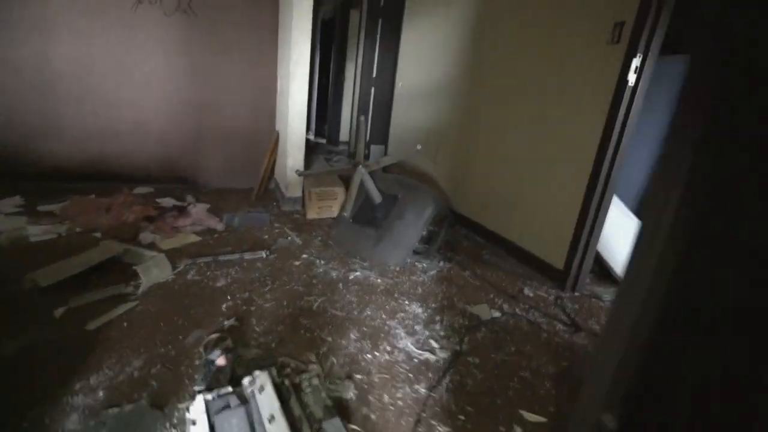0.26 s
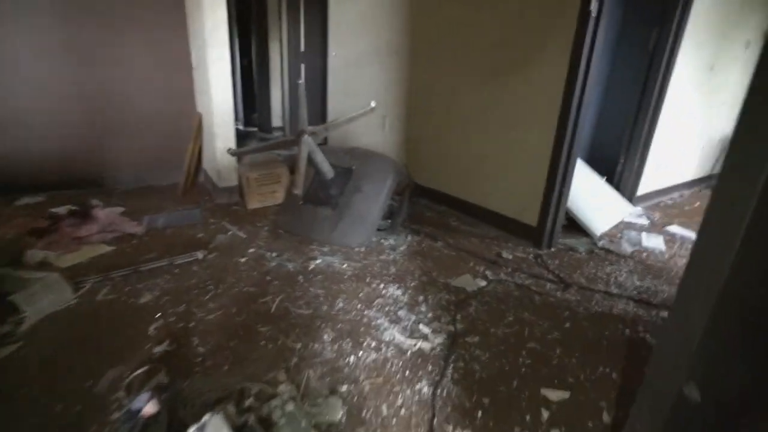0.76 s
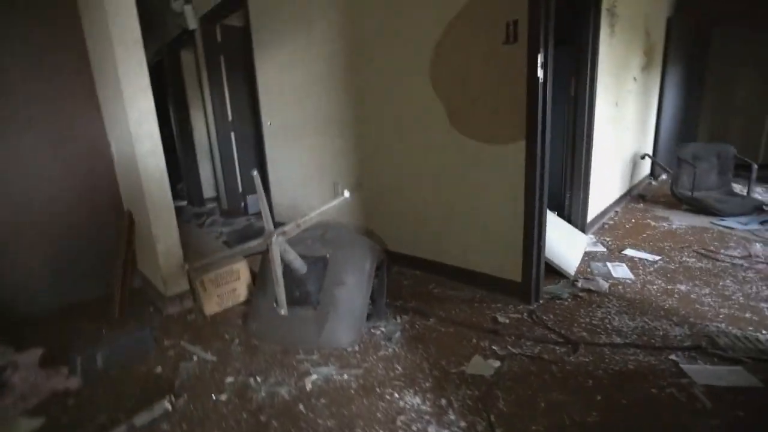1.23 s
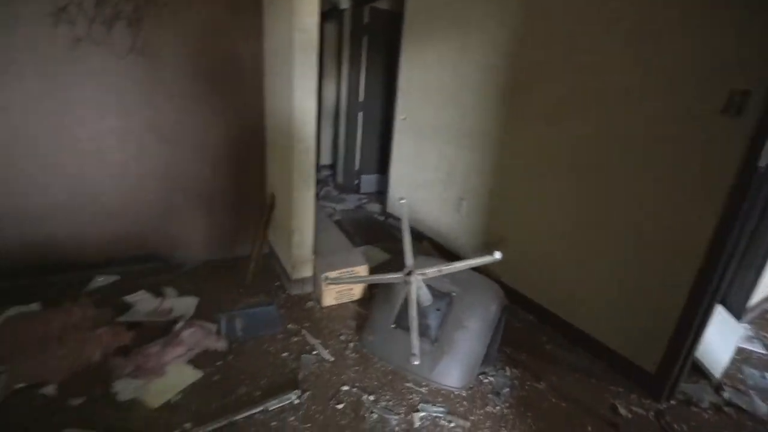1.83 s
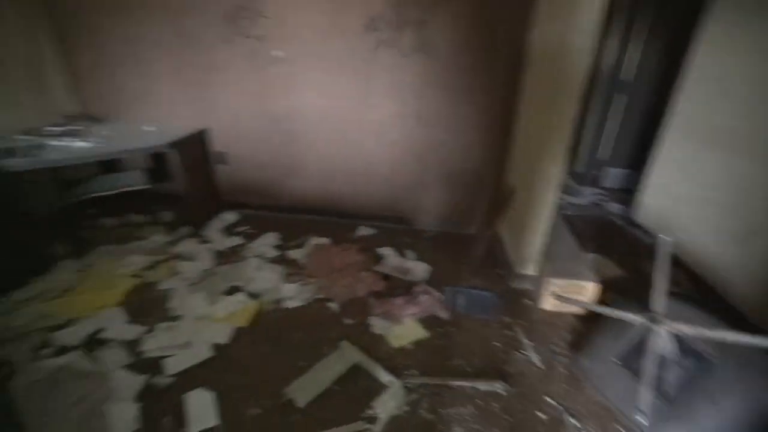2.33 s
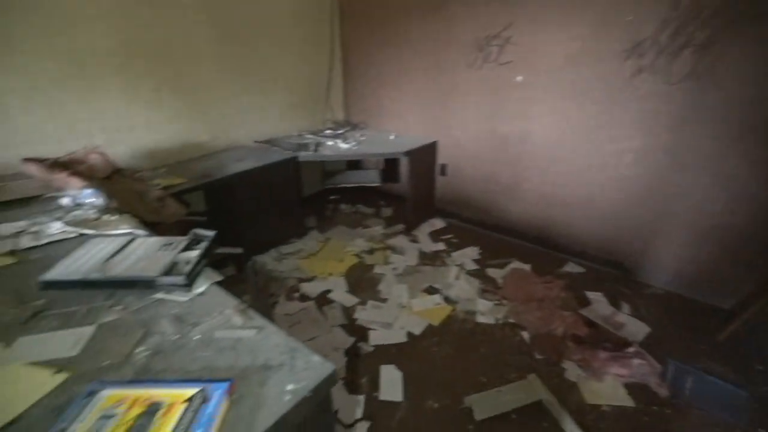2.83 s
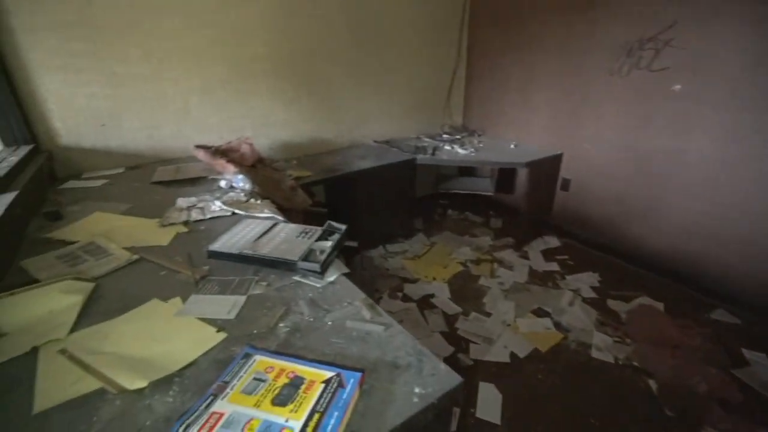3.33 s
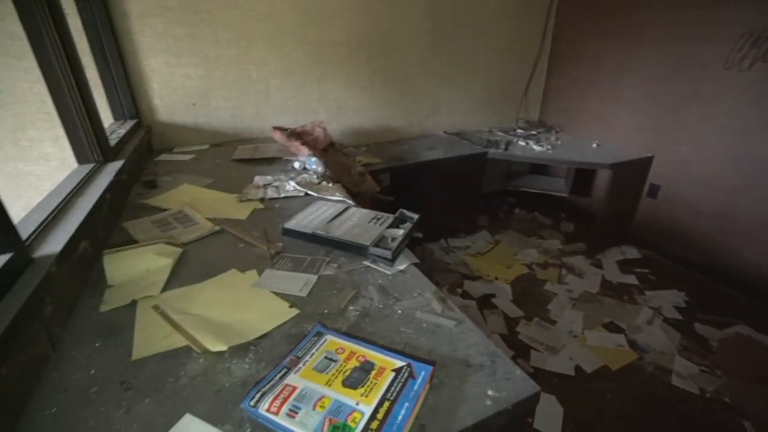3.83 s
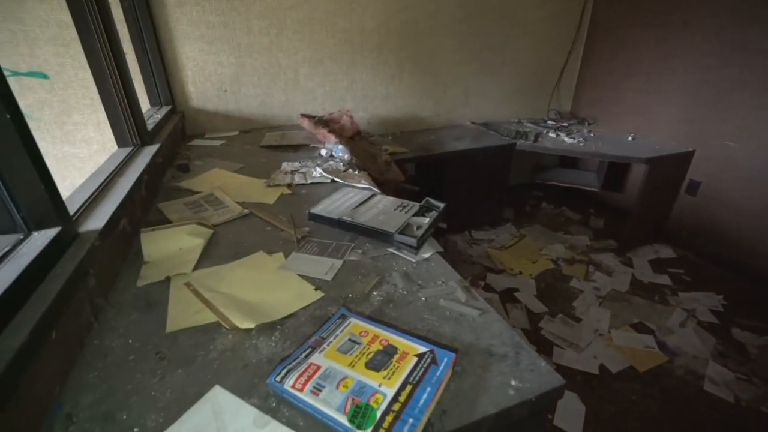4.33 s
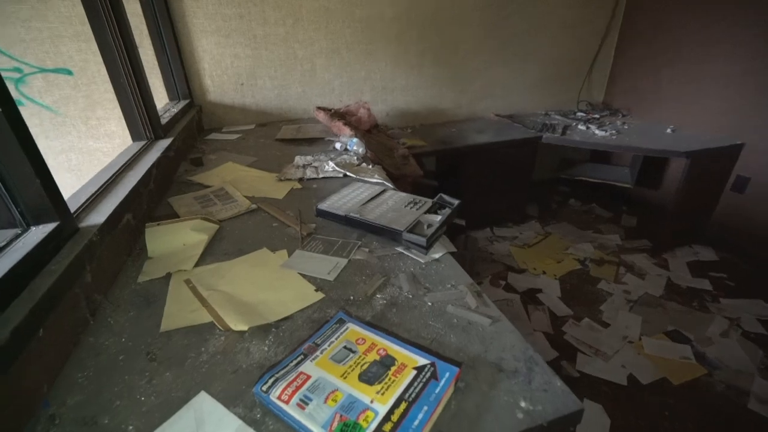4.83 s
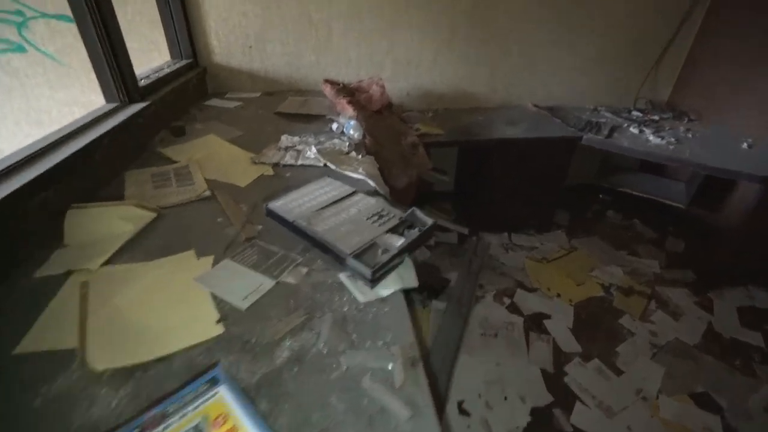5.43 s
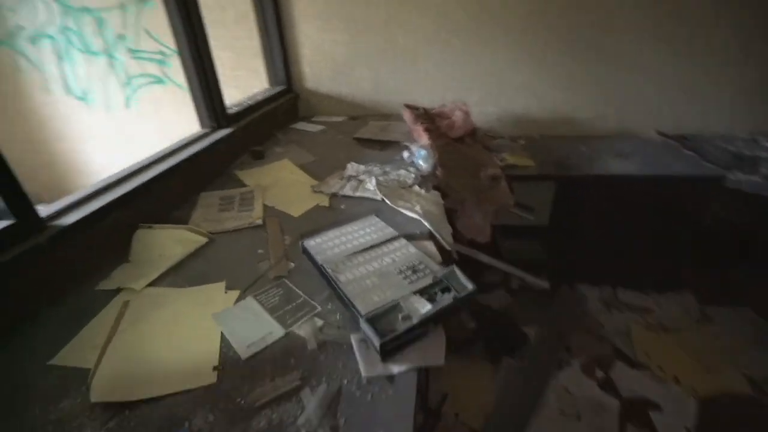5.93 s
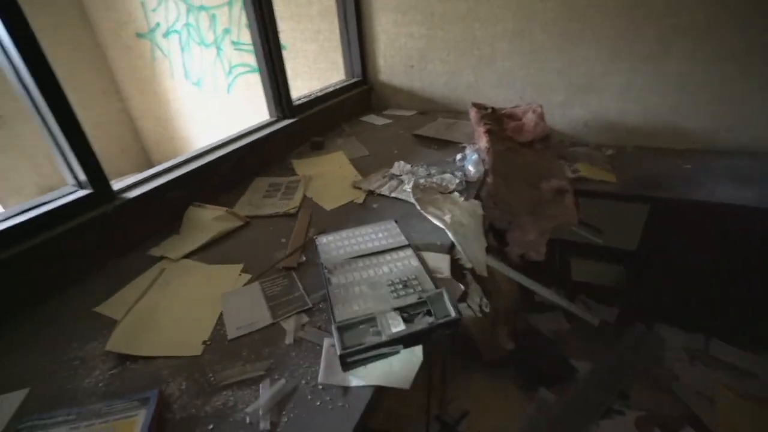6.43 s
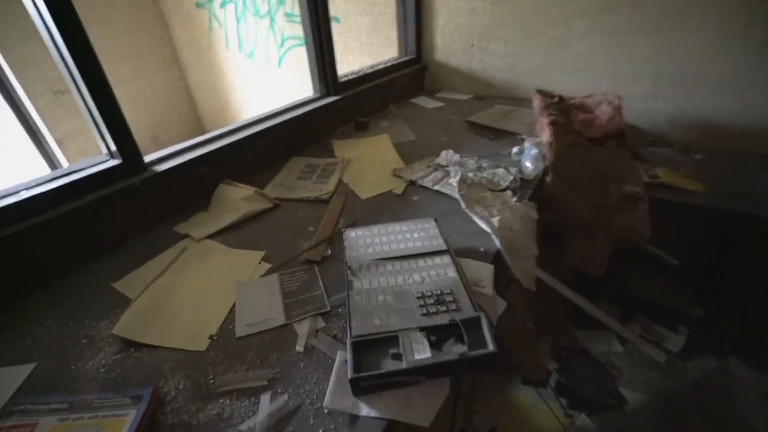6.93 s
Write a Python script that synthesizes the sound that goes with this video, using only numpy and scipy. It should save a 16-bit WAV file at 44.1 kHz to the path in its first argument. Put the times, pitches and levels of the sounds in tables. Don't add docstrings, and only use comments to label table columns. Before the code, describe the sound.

Close, crisp stereo sound of soles pressing glass grit, paper and carpet inside a small hard-walled room. Busy cracking and tinkling fragments come first, including a strong thud with a faint metallic ring, then a heavy scuffing step. The walking thins to light knocks and near silence before glass grinds again under a dragging foot. Dry ticks and faint scuffs end it, over low air rumble and soft hiss.

```python
import sys
import numpy as np
from scipy import signal
from scipy.fft import rfft, irfft, next_fast_len
from scipy.io import wavfile
from scipy.ndimage import uniform_filter1d

SR = 44100
rng = np.random.default_rng(int(sys.argv[2]) if len(sys.argv) > 2 else 0)


def ratio(d):
    e = np.asarray(d, float) / 20
    return 10 ** e


def unload_wav(signal):
    wavfile.write(
        sys.argv[1],
        SR,
        np.round(np.clip(np.atleast_2d(signal).T, -1, 1) * 32767).astype(np.int16),
    )


N = 316638


def evened(x):
    return x / np.sqrt(np.mean(x ** 2) + 1e-20)


def peaked(x):
    return x / abs(x).max()


def read(points, hz):
    point_hz, value = np.transpose(points)
    return np.interp(np.log(hz + 1), np.log(point_hz + 1), value)


def curve(table, column):
    rows = np.array(table)
    return np.interp(np.arange(N) / SR, rows[:, 0], rows[:, column])


def add(mix, start_s, sound, pan_db, lag=1):
    for side, sign, late in ((0, 1, 0), (1, -1, lag)):
        part = mix[side, round(start_s * SR) + late:][:len(sound)]
        part += ratio(sign * pan_db / 2) * sound[:len(part)]


def ring(hz, t60_s, rise_s=0.0001, size=4096):
    t = np.arange(size) / SR
    return ratio(-60 * t / t60_s) * (1 - np.exp(-t / rise_s)) * np.sin(2 * np.pi * hz * t)


def band(x, low_hz, high_hz):
    return signal.sosfilt(signal.butter(2, [low_hz, high_hz], "band", fs=SR, output="sos"), x)


def swells(start_s, hold_s, top_db, rise_db_per_s, fall_db_per_s, rest_db):
    t = np.arange(0, N + 64, 64)[:, None] / SR
    down_db = rise_db_per_s * np.maximum(start_s - t, 0)
    down_db = down_db + fall_db_per_s * np.maximum(t - start_s - hold_s, 0)
    power = (ratio(top_db - down_db) ** 2).sum(1) + ratio(rest_db) ** 2
    return np.interp(np.arange(N) / SR, t[:, 0], 10 * np.log10(power))


# start_s, left_right_db
FEET = [
    (0, -2.5),
    (.8, 3),
    (2.0, 5.5),
    (2.5, -2),
    (3.2, 1),
    (3.8, -1.5),
    (5.0, -1.5),
    (6.0, 0.5),
    (7.18, -3.5),
]
# start_s, peak_db, pitch_hz, edge_db,
# room_db
SNAPS = [(0.0768, -24, 2600, -49, -24), (0.229, -26, 3600, -36, -10), (0.243, -21, 5200, -17, -14),
         (0.266, -23.5, 2350, -8.5, -4.5), (0.8368, -26, 1520, -50, -1), (0.8885, -25.5, 4600, -22, -8),
         (0.9384, -25.5, 3670, -36, -4.5), (1.1752, -24.5, 4900, -30, -9), (1.2474, -18, 4220, -40, -6),
         (1.3023, -20, 4300, -45, -7.5), (1.422, -15, 2700, -46, -15.5), (1.5428, -21.5, 4200, -30, -1),
         (1.7454, -31, 5150, -15.5, -2.5), (1.903, -22, 4350, -12, -8), (1.9525, -20, 4700, -16, -7),
         (1.982, -22.5, 2140, -17, -1.5), (1.998, -23, 5160, -11, 2), (2.0034, -18, 1900, -11, -8.5),
         (2.6452, -25, 2820, -38, -6), (2.6566, -22.5, 2940, -22, -9), (2.7724, -18, 1890, -47, -3),
         (3.484, -32.5, 1580, -26, -4.5), (4.1988, -50, 6200, 7.5, -21), (5.0005, -28.5, 1525, -22, -1.5),
         (5.047, -21.5, 2930, -36, 0), (5.136, -21.5, 1480, -36, 0)]
# start_s, peak_db, pitch_hz
CHIPS = [(0.434, -36, 3000), (0.662, -36, 3120), (0.6902, -41, 3100), (0.7333, -31, 3100),
         (0.9164, -29.5, 3660), (1.106, -37.5, 2720), (1.133, -33, 1670), (1.1873, -34, 1670),
         (1.3304, -24.5, 1400), (1.8441, -29, 1940), (2.149, -46, 1780), (2.498, -39, 2850),
         (2.61, -33, 1740), (3.1266, -42.5, 1530), (3.234, -43, 1300), (3.2514, -46, 1360),
         (3.263, -44, 1780), (3.2988, -38.5, 1300), (3.31, -47, 1300), (3.5589, -37.5, 1320),
         (3.863, -46, 2350), (3.754, -48, 2510), (2.59, -35, 2000), (4.185, -48.5, 1430),
         (4.956, -44, 1570), (5.319, -33, 1310), (5.9782, -47, 1310), (6.0484, -39.5, 1790),
         (6.2, -42, 1390), (6.9265, -46, 1390), (6.9857, -39, 1270)]
# start_s, peak_db, pitch_hz
SLIVERS = [(0.1735, -32, 4700), (0.1875, -30, 2900), (0.246, -31, 3600), (0.2795, -25.5, 5300),
           (0.614, -38.5, 5800), (0.6179, -43, 5800), (0.7698, -50, 4470), (0.8127, -38.5, 5230),
           (0.945, -34, 6000), (0.954, -35, 6000), (1.0227, -28.5, 4760), (1.0305, -33, 5800),
           (1.0465, -28, 5370), (1.0827, -27, 5300), (1.133, -27, 5540), (1.1452, -28, 4900),
           (1.1838, -34, 5500), (1.1884, -34, 6000), (1.2105, -28, 5300), (1.2192, -30, 5500),
           (1.265, -29, 5130), (1.372, -26, 4300), (1.5062, -41, 5530), (1.6074, -35, 5000),
           (1.632, -28, 5760), (1.6942, -41, 5000), (1.7279, -40, 6500), (1.7347, -34, 6270),
           (1.7761, -40, 6500), (1.8162, -31, 6500), (1.8353, -30, 6160), (1.886, -33, 6500),
           (1.8904, -29, 5760), (1.915, -34, 4030), (2.1612, -43, 5500), (2.189, -40, 5530),
           (2.1998, -43, 5500), (2.211, -41, 5500), (2.26, -41, 5500), (2.28, -35, 5730),
           (2.298, -34, 6000), (2.3092, -40, 4430), (2.5106, -34, 5800), (3.7157, -50, 6500),
           (3.767, -40.5, 5940), (3.7887, -49, 6000), (3.823, -57, 6500), (3.875, -51, 6500),
           (3.986, -51, 8000), (5.4796, -41, 5500), (5.512, -42, 5500), (5.569, -42, 4870),
           (5.6147, -40, 4480), (5.7008, -46, 5940), (5.7366, -40, 3960), (5.927, -49, 6500),
           (7.144, -46, 4500), (7.15, -43, 6500)]
CHIP_EDGE_DB, CHIP_ROOM_DB, SLIVER_EDGE_DB, SLIVER_ROOM_DB = -25, -1.5, -32, -4.5


def cracks(near, far):
    t, pan_db = np.arange(2048) / SR, curve(FEET, 1)
    click = 1. * (t == 0)
    chips = [(*row, CHIP_EDGE_DB, CHIP_ROOM_DB) for row in CHIPS]
    slivers = [(*row, SLIVER_EDGE_DB, SLIVER_ROOM_DB) for row in SLIVERS]
    for k, (start_s, peak_db, hz, edge_db, room_db) in enumerate(SNAPS + chips + slivers):
        splinters = click + .6 * rng.standard_normal(2048) * ratio(-60 * t / .01)
        for drive, mix, more_db in ((splinters, near, 2), (click, far[k % 3], room_db + 13)):
            body = band(drive, hz / 1.3, hz * 1.3)
            body = body + .6 * band(drive, max(hz / 2, 900), max(hz * 1.4, 6500))
            edge = band(band(drive, 5500, 12500), 4000, 14500)
            snap = peaked(body) + ratio(edge_db + 6) * peaked(edge)
            add(mix, start_s, ratio(peak_db + more_db) * snap, pan_db[round(start_s * SR)])


# start_s, peak_db
SPECKS = [(0.1572, -33), (0.243, -26), (0.267, -31), (0.2797, -36), (1.1058, -33), (1.2493, -28),
          (1.555, -26.5), (1.6785, -39), (1.7621, -37), (1.8357, -35), (1.9025, -31), (1.9529, -33),
          (1.982, -31), (1.9981, -31), (2.0028, -23), (2.1103, -46), (2.1495, -45), (2.1779, -42),
          (2.4877, -40), (2.4992, -36), (2.6214, -36), (2.632, -40), (2.6381, -35), (2.658, -45),
          (2.7868, -40), (3.565, -47), (3.791, -48), (3.959, -56), (4.9675, -44), (4.9868, -41),
          (5.015, -31), (5.0601, -30), (5.1494, -24), (5.2838, -39), (5.6183, -40), (5.7004, -47),
          (5.7089, -40), (7.1548, -38)]
SPECK_LOW_HZ, SPECK_HIGH_HZ, SPECK_T60_S = 6500, 12800, 0.011


def specks(near, far):
    t, pan_db = np.arange(1024) / SR, curve(FEET, 1)
    for start_s, peak_db in SPECKS:
        burst = rng.standard_normal(1024) * ratio(-60 * t / SPECK_T60_S)
        flick = band(band(burst, SPECK_LOW_HZ, SPECK_HIGH_HZ), SPECK_LOW_HZ, 17000)
        flick = ratio(peak_db) * peaked(flick)
        add(near, start_s, flick, pan_db[round(start_s * SR)])
        add(far[2], start_s, flick, 0)


def grains(low_hz, high_hz, per_s, cycles, spread_db, count=16):
    clump = ratio(2.5 * evened(uniform_filter1d(rng.standard_normal(N), 500)))
    size = ratio(spread_db * np.minimum(rng.exponential(1, N), 3.5))
    size *= rng.random(N) < clump * per_s / SR
    size *= rng.choice([-1., 1.], N)
    kind, out = rng.integers(0, count, N), np.zeros((2, N))
    for k, hz in enumerate(np.geomspace(low_hz, high_hz, count)):
        grain = ring(hz, cycles / hz, size=1024)
        one = signal.oaconvolve(size * (kind == k), grain / np.linalg.norm(grain))[:N]
        out += one * ratio((-1) ** k * np.array([[4.], [-4.]]))
    return evened(out) * ratio(curve(FEET, 1) * np.array([[.5], [-.5]]))


# start_s, hold_s, grit_db, scuff_db (glass grit; paper and carpet scuff)
PRESSES = [(0.0, 0.0055, -44.5, -41), (0.077, 0.008, -41, -41.5), (0.15, 0.019, -50, -62),
           (0.362, 0.14, -54, -55), (0.561, 0.23, -54.5, -56.5), (0.882, 0.14, -42, -48.5),
           (1.047, 0.33, -49, -47.5), (1.294, 0.047, -41, -48), (1.424, 0.03, -40, -38.5),
           (1.493, 0.29, -54.5, -56), (1.838, 0.073, -47, -49.5), (1.898, 0.018, -47, -55),
           (1.956, .015, -45, -52), (2.001, 0.048, -37, -50), (2.077, 0.11, -51.5, -57.5),
           (2.266, 0.21, -51.5, -54.5), (2.487, 0.11, -47, -75), (2.723, 0.11, -52.5, -49.5),
           (2.846, 0.83, -66, -63.5), (3.71, 0.23, -65.5, -67), (4.45, 0.55, -94, -72),
           (4.961, 0.013, -50.5, -58), (5.005, 0.082, -42, -59), (5.142, 0.033, -39.5, -60),
           (5.322, 0.073, -44, -60), (5.43, 0.41, -60.5, -61), (5.61, 0.022, -55, -64),
           (5.726, 0.024, -57.5, -69), (5.92, 0.23, -60.5, -58.5), (6.164, 0.073, -59, -53.5),
           (6.944, 0.073, -52.5, -47), (7.057, 0.17, -58.5, -50.5)]
PRESS_DB_PER_S, LIFT_DB_PER_S, REST_DB = 614, 256, -73
DUST_DB, DUST_FOLLOW = -58, 0.72
# peak_s, spread_s, grit_db, scuff_db, dust_db
SLIDES = [
    (0.319, 0.24, -41, -43, -48.5),
    (2.025, 0.067, -50, -43.5, -56),
    (2.667, 0.17, -38.5, -39.5, -57),
    (4.2, 0.02, -62, -80, -59),
    (5.186, 0.21, -48, -48.5, -53),
    (5.253, 0.22, -45, -44.5, -50),
    (5.37, 0.18, -45.5, -46.5, -51),
    (6.243, 0.14, -49.5, -52, -55),
    (6.58, 0.34, -66.5, -62, -73),
    (7.01, 0.058, -49.5, -50, -55),
]
SLIDE_DB, STOP_DB_PER_S, SLIDE_HOLD_S = 16.5, 439, 0.017


def crunch():
    start_s, hold_s, grit_db, scuff_db = np.transpose(PRESSES)
    grit_db = swells(start_s, hold_s, grit_db, PRESS_DB_PER_S, LIFT_DB_PER_S, REST_DB)
    scuff_db = swells(start_s, hold_s, scuff_db, PRESS_DB_PER_S, LIFT_DB_PER_S, REST_DB)
    dust_db = DUST_DB + DUST_FOLLOW * (grit_db + 50)

    peak_s, spread_s, *slide_levels_db = np.transpose(SLIDES)
    slide_start_s, build_db_per_s = peak_s - SLIDE_HOLD_S / 2, SLIDE_DB / spread_s
    slid_grit, slid_scuff, slid_dust = [
        ratio(swells(slide_start_s, SLIDE_HOLD_S, db, build_db_per_s, STOP_DB_PER_S, -120))
        for db in slide_levels_db]

    grit = ratio(grit_db) * grains(1800, 7500, 2600, 8, 2.6)
    grit = grit + slid_grit * grains(1400, 5600, 3000, 8, 2.3)
    scuff = np.hypot(ratio(scuff_db), slid_scuff) * grains(400, 2100, 1500, 6, 2.3)
    dust = np.hypot(ratio(dust_db), slid_dust) * grains(7000, 14000, 5000, 5, 2.5)
    return ratio(-2) * band(grit + scuff + dust, 180, 20000)


TWIN_SHARE, TWIN_RATIO = 0.35, 1.09


def strike(near, far, start_s, peak_db, hz, t60_s, room_db, rough_share):
    t = np.arange(4096) / SR
    thump = peaked(band(1. * (t == 0), 197, 1750))
    modes = ring(hz, t60_s, 1 / hz) + TWIN_SHARE * ring(hz * TWIN_RATIO, t60_s / 2, 1 / hz)
    piece = peaked(band(modes, 185, 4200))
    burst = rng.standard_normal(4096) * ratio(-60 * t / 0.07) * (1 - np.exp(-t / 0.00017))
    rough = peaked(band(burst, 420, 1050))
    air_s = start_s + .001
    add(near, air_s - .005, ratio(peak_db - 22) * ring(300, .02, .002), 1.5)
    add(near, air_s, ratio(peak_db - 5) * (piece + rough_share * rough), 1.5, 4)
    add(far, air_s, ratio(peak_db + room_db - 3.5) * (.6 * piece + 2.04 * thump), 0)


# start_s, peak_db, pitch_hz, room_db
KNOCKS = [(0.074, -23.5, 283, 2.5), (0.174, -30, 290, 1), (0.262, -30.5, 750, 2), (0.834, -29.5, 835, -0.5),
          (1.209, -27.5, 306, 0.5), (1.2466, -17.5, 1490, -0.5), (1.343, -23.5, 320, -11),
          (1.4225, -12, 345, -5), (1.999, -27.5, 620, -6.5), (2.357, -38.5, 370, 9),
          (2.526, -32.5, 375, 2.5), (2.641, -25.5, 340, -7), (2.7725, -10, 350, -2),
          (3.125, -25.5, 293, -3), (3.232, -31, 477, 0.5), (3.246, -28, 563, -6), (3.261, -25, 540, -4),
          (3.295, -23.5, 356, -6), (3.311, -27.5, 513, -5), (3.48, -22, 513, -5.5), (3.561, -36.5, 526, -5),
          (4.391, -46.5, 530, -11), (4.997, -37, 1050, -20), (5.0458, -26, 374, 1),
          (5.135, -26, 1000, -5.5), (5.316, -35.5, 1030, 5.5), (5.609, -38.5, 655, -8),
          (5.973, -38.5, 1090, -2), (6.003, -37, 634, 0), (6.159, -41, 910, -7), (6.169, -41, 1100, -8),
          (6.179, -38, 960, -8), (6.1982, -32.5, 805, -11), (6.211, -36, 1010, -5), (6.986, -28, 335, 2.5)]
KNOCK_T60_S = 0.015


def knocks(near, far):
    for k, (start_s, peak_db, hz, room_db) in enumerate(KNOCKS):
        strike(near, far[k % 3], start_s, peak_db, hz, KNOCK_T60_S, room_db, rough_share=.6)


# start_s, peak_db, pitch_hz, t60_s, room_db
CLACKS = [(0.0746, -25, 291, 0.092, 0), (0.0785, -18.5, 1087, 0.039, -10), (0.0755, -23, 590, .015, -1),
          (1.134, -41, 1550, .1, 8), (0.971, -18.5, 1137, 0.062, -2), (5.226, -32.5, 1104, 0.045, 4.5),
          (5.389, -37, 1200, 0.041, 9.5), (6.212, -38, 1430, 0.029, 8), (7.7, -42, 1500, .02, 6),
          (6.989, -29.5, 1015, 0.057, -2), (7.03, -47, 2125, 0.08, 13), (2.773, -16, 745, 0.02, 0.5),
          (5.048, -26.5, 2220, 0.0088, 7), (2.786, -23, 2020, 0.023, -6), (2.8, -30.5, 627, 0.034, -3.5),
          (1.425, -19, 1470, 0.014, 3.5)]


def clacks(near, far):
    for k, (start_s, peak_db, hz, t60_s, room_db) in enumerate(CLACKS, len(KNOCKS)):
        strike(near, far[k % 3], start_s, peak_db, hz, t60_s, room_db, rough_share=.2)


# start_s, peak_db
ROD_HITS = [
    (1.4228, -37),
    (2.773, -50),
]
# mode_hz, level_db, t60_s
ROD = [(11055, 5, 0.12), (11083, 2, 0.13), (11270, -10, .15), (11800, -5, .06), (10700, -23, 0.18),
       (10000, -10, 0.13)]


def rod(near, far):
    chime = sum(ratio(db) * ring(hz, t60_s, size=12000) for hz, db, t60_s in ROD)
    for start_s, peak_db in ROD_HITS:
        add(near, start_s, ratio(peak_db) * chime, 0)
        add(far[0], start_s, ratio(peak_db + 3) * chime, 0)


# start_s, peak_db
TICKS = [
    (5.4411, -31),
    (5.4482, -21.5),
    (5.4523, -26),
    (5.5366, -37),
    (5.5406, -28),
    (5.6608, -28),
    (5.9113, -33.5),
]


def ticks(near):
    for start_s, peak_db in TICKS:
        shift = rng.uniform(.96, 1.04, 3)
        tick = ring(6650, .005, .0002)
        tick += .4 * ring(5200 * shift[0], .006, .0003)
        tick += .3 * ring(4300, .003, .0002)
        tick += .12 * ring(8500 * shift[1], .004, .0001)
        tick += .1 * ring(13000 * shift[2], .004, .0001)
        add(near, start_s, ratio(peak_db) * peaked(tick), 5.0, 0)


# band_hz, t60_s
ROOM = [(150, 0.19), (500, 0.29), (1500, 0.14), (4000, 0.15), (9000, 0.24), (16000, 0.1)]
WALL_S, WALL_DB, GAP_DB = .0125, -5, -7


def room(x, size=20000):
    taps = np.zeros((2, size))
    at = np.arange(60, size - 20, 20)
    at = at + rng.integers(0, 20, (2, len(at)))
    np.put_along_axis(taps, at, rng.choice([-1., 1.], at.shape), 1)
    t = np.arange(size) / SR
    taps *= np.where(t < WALL_S, ratio(GAP_DB), 1 + ratio(WALL_DB) * np.exp(-(t - WALL_S) / .003))
    hz, frame_s, z = signal.stft(taps, SR, nperseg=128)
    decay = ratio(-60 * frame_s / read(ROOM, hz)[:, None])
    tail = signal.istft(z * decay, SR, nperseg=128)[1]
    tail /= np.linalg.norm(tail, axis=1)[:, None]
    return signal.fftconvolve(x.mean(0)[None], tail, axes=1)[:, :N] * ratio([[-.5], [.5]])


# band_hz, gain_db
PORTS = [(60, -24), (250, -16), (500, -10.5), (1000, -3), (2000, 3.5), (4000, 4), (12000, -0.5)]


def ports(steps):
    mid, side = (steps[0] + steps[1]) / 2, (steps[0] - steps[1]) / 2
    size = next_fast_len(N + 4096)
    gain = ratio(read(PORTS, np.fft.rfftfreq(size, 1 / SR)))
    side = irfft(rfft(side, size) * gain, size)[:N]
    return np.array([mid + side, mid - side])


# peak_s, level_db, rise_db_per_s, fall_db_per_s
GUSTS = [
    (.08, -45, 300, 113),
    (1.1, -44.5, 113, 44),
    (1.22, -46, 100, 35),
    (3.26, -60.5, 40, 40),
    (6.26, -61, 130, 66),
]
CALM_DB = -68


def draught():
    both, apart = band(band(rng.standard_normal((2, N)), 31, 136), 38, 125)
    peak_s, top_db, rise_db_per_s, fall_db_per_s = np.transpose(GUSTS)
    level_db = swells(peak_s, 0, top_db, rise_db_per_s, fall_db_per_s, CALM_DB)
    return ratio(level_db) * evened(both + 0.12 * apart * np.array([[1], [-1]]))


# band_hz, level_db_per_hz
HISS = [(59, -10), (100, -1), (230, -5.5), (500, -7.5), (1120, -12), (1350, -15), (7690, -22), (15800, -31)]
# band_hz, likeness_0_to_1
HISS_SAME = [(60, 1), (180, 0.85), (550, 0.21), (1650, 0.023), (4970, 0.046), (15000, 0.054)]
HISS_DB = -61.5


def hiss():
    frames, hz = N // 256 + 5, np.fft.rfftfreq(1024, 1 / SR)
    a, b, c, d, patches = rng.standard_normal((frames, 513, 5)).T
    patches = evened(uniform_filter1d(uniform_filter1d(patches, 12, 0), 14, 1))
    same = np.clip(read(HISS_SAME, hz), -1, 1)[:, None]
    left, other = a + 1j * b, c + 1j * d
    z = np.array([left, same * left + np.sqrt(1 - same ** 2) * other])
    z *= ratio(read(HISS, hz)[:, None] + 1.1 * patches)
    return ratio(HISS_DB) * evened(signal.istft(z, nperseg=1024, noverlap=768)[1][:, :N])


def scene():
    near, far = np.zeros((2, N)), np.zeros((3, 2, N))
    cracks(near, far)
    specks(near, far)
    rolling = crunch()
    far[1] += ratio(-3) * rolling
    knocks(near, far)
    clacks(near, far)
    rod(near, far)
    ticks(near)
    steps = near + rolling + sum(room(x) for x in far)
    return ports(steps) + draught() + hiss()


def band_limit(x):
    return signal.sosfilt(signal.butter(12, 16490, fs=SR, output="sos"), x)


EDGE_HZ = 16100


def record(dry):
    edge = signal.firwin(511, EDGE_HZ, window=("kaiser", 9), fs=SR)
    mix = signal.oaconvolve(dry, edge[None], "same")
    return band_limit(mix)


dry = scene()
out = record(dry)
unload_wav(out)
```